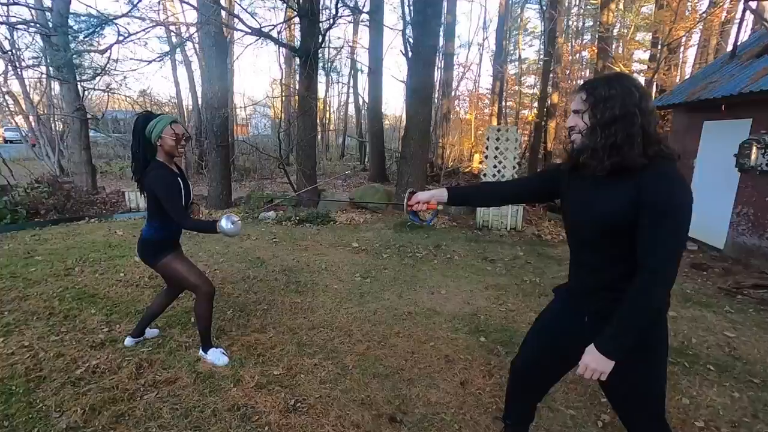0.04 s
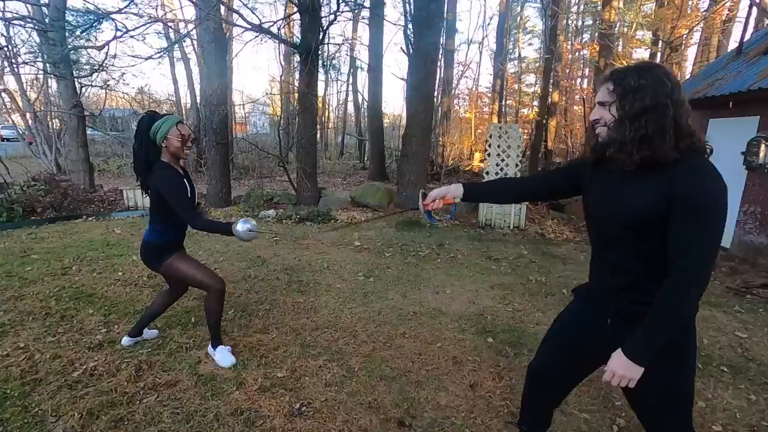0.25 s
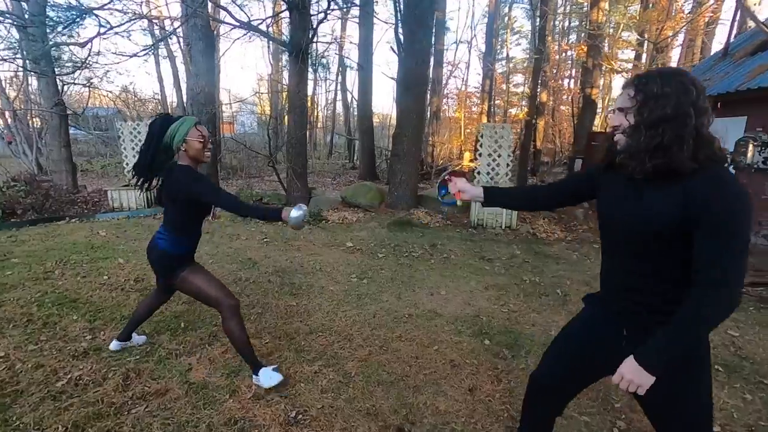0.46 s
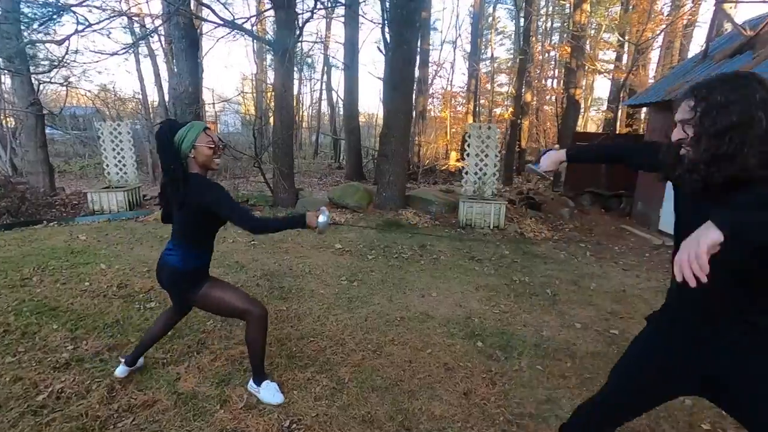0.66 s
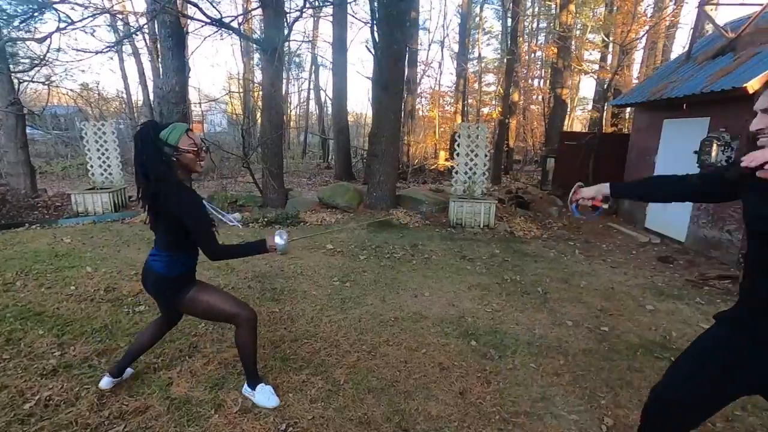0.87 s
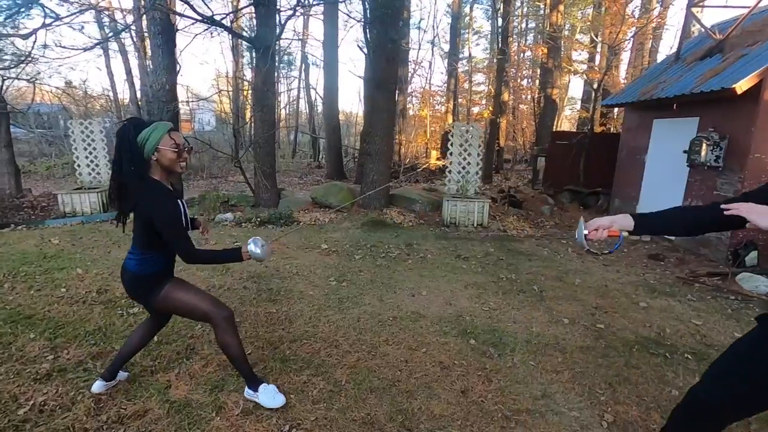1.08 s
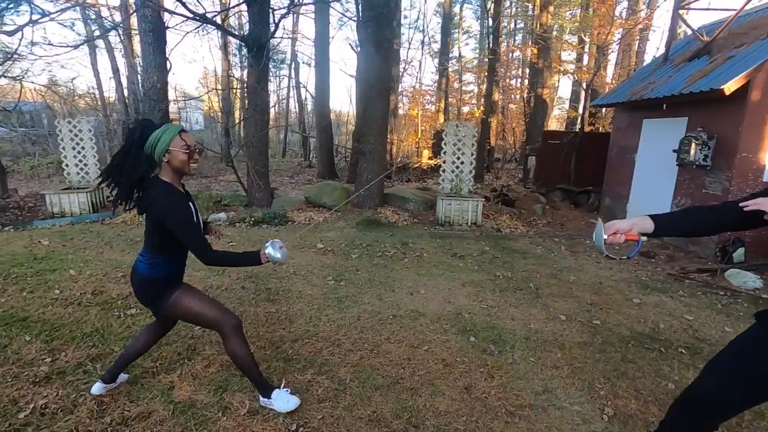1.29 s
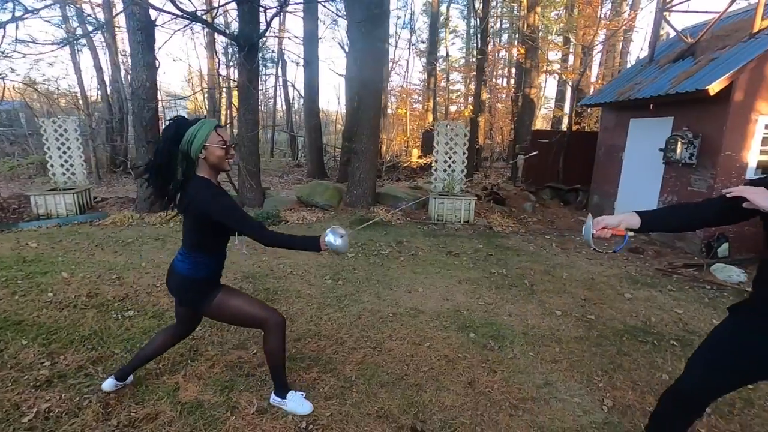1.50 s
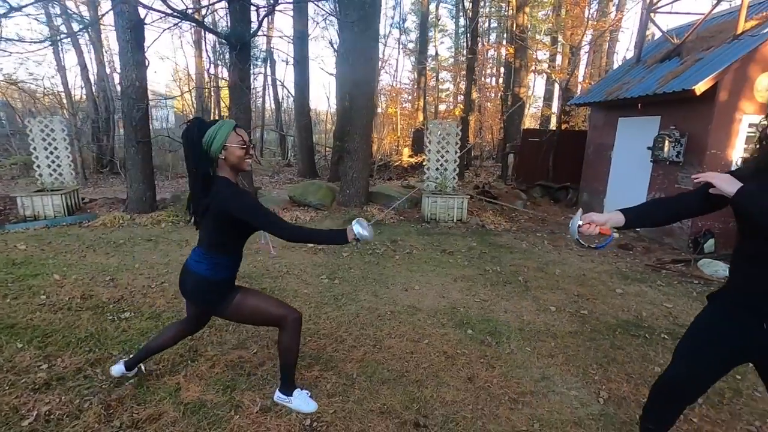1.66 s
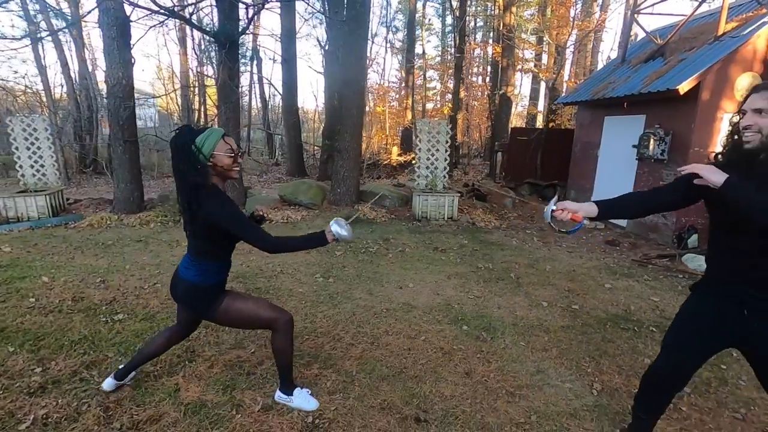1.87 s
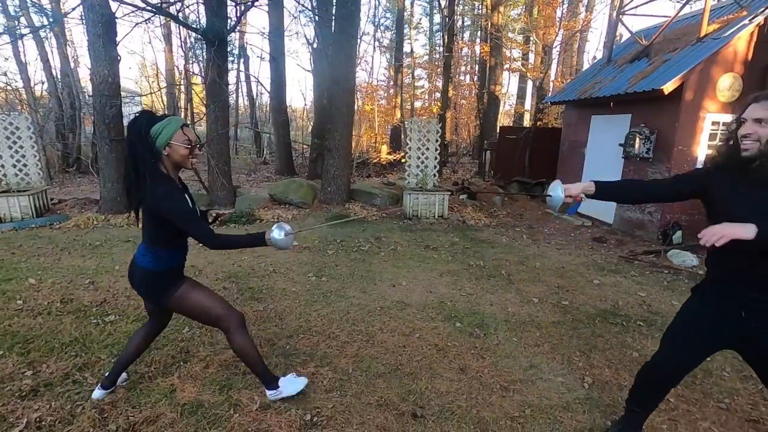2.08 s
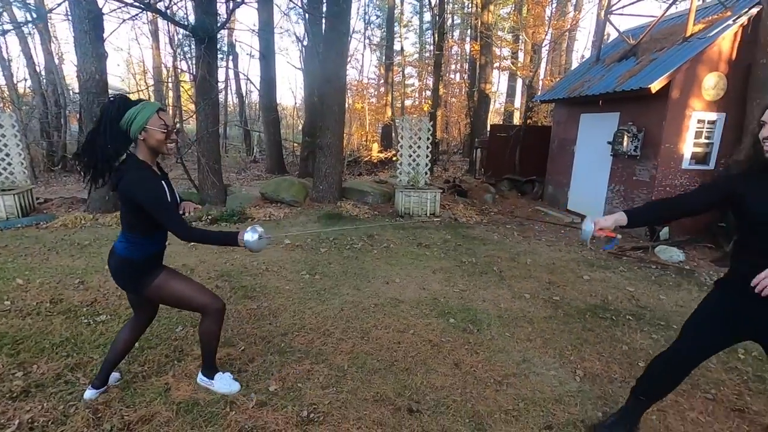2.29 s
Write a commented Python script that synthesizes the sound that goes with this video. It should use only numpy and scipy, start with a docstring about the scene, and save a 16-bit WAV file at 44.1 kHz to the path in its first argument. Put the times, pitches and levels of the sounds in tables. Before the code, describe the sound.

Thin sword blades scrape and clash in a short fencing exchange outdoors.

```python
"""A leafy lawn, two fencers sparring a few metres away. Their thin blades slide along each other twice,
one blow lands on a bell guard, then come a quick rattling exchange and a last ringing beat.
Impact and friction excite the modes of the steel; trees scatter the sound. Feet thud on turf and stir
dry leaves. A low drone, likely a distant engine, swells and fades."""
import sys
import numpy as np
from scipy import signal
from scipy.fft import rfft, irfft
from scipy.io import wavfile
from scipy.ndimage import uniform_filter1d

SR = 44100
rng = np.random.default_rng(int(sys.argv[2]) if len(sys.argv) > 2 else 0)


def unload_wav(signal):
    """Save mono or channel-first audio to the path in sys.argv[1] as 16-bit WAV at rate SR, clipped to [-1, 1]."""
    wavfile.write(
        sys.argv[1],
        SR,
        np.round(np.clip(np.atleast_2d(signal).T, -1, 1) * 32767).astype(np.int16),
    )


N = 108045
TOP_HZ, STEEL_SKEW_RAD = 16000, 0.32

# Dry-leaf spectrum. Each row: frequency in Hz, gain in dB.
LEAF_SPECTRUM = [(200, -5.5), (500, -8.5), (1300, 6), (2500, 0.5), (4500, 0), (7000, -2.5), (10000, -16),
                 (13000, -15), (16000, -43)]


def blows(size=2600, onset_samples=300, crack_gain=0.54, crack_peak_s=0.00096, crack_low_hz=1080):
    """Contact cracks; impact and brief chatter excite the steel; blades and guard ring on."""
    # Each row: start in seconds, clash level in dB, tilt in dB per octave, chatter decay in seconds,
    # then clang, first blade, second blade, guard and left-over-right levels in dB.
    hits = [(0.6195, -16.5, -2, 0.0016, -32, -60, -48, -12, 1.5),
            (1.6791, -18, 0.6, 0.012, -23, -38, -39, -34, -2),
            (1.6965, -25.5, -1, .004, -42, -44, -43, -55, 1),
            (1.7403, -20.5, -1, .009, -32, -37, -43, -38, 0.5),
            (1.7742, -22, -1, .010, -32, -35.5, -50, -48, 1.5),
            (2.0715, -16, 1.84, 0.00092, -27, -28.5, -45, -45, -0.5),
            (2.0832, -34, 3, .0015, -38, -46, -48, -52, 3)]
    # Each row: frequency in Hz, gain in dB.
    clash_spectrum = [(200, -27), (550, -15.5), (750, -15), (1000, -2.5), (1500, 0.5), (2000, -2.5),
                      (2300, 2), (2700, -4), (3600, -2), (5200, -3.5), (6800, 4), (8400, 6.5), (10000, -7),
                      (12000, -2), (13500, -16), (16000, -23)]
    out, t = np.zeros((2, N)), seconds(size)
    hz, gain, tones = steel_modes(t60_at_3khz_s=0.074)
    crack_band = signal.butter(2, [crack_low_hz, TOP_HZ / 2], "band", fs=SR, output="sos")
    crack_envelope = crack_gain * t / crack_peak_s * np.exp(1 - t / crack_peak_s)
    for at, db, tilt_db, chatter_s, clang_db, first_db, second_db, guard_db, pan_db in hits:
        force = friction(size) * np.exp(-t / chatter_s)
        force /= np.linalg.norm(force)
        force[0] += 1  # initial impact
        weights = gain * curve(clash_spectrum, hz) * undb(tilt_db * np.log2(hz))
        clash = convolve(force, radiate(tones, weights, STEEL_SKEW_RAD))
        crack = unit(signal.sosfilt(crack_band, rng.standard_normal(size))) * crack_envelope
        add(out, at, undb(db) * clash / np.std(clash[:, :onset_samples]), pan_db)
        add(out, at, undb(db) * crack, pan_db)
        add(out, at, undb(clang_db) * clang())
        add(out, at, blades(first_db, second_db) + undb(guard_db) * guard())
    return out


def slides(low_cut_hz=800):
    """Edge runs along edge: swelling friction drives the blades, damped while they touch."""
    # Each row: peak time, rise and fall in seconds,
    # then scrape, clang, first blade, second blade and left-over-right levels in dB.
    strokes = [(.247, 0.017, .011, -19.5, -30.5, -45, -32, 1), (0.33, .012, .009, -20, -36, -68, -43, -0.5),
               (1.812, .025, 0.01, -29, -39.5, -45.5, -33, 1)]
    # Each row: frequency in Hz, gain in dB.
    scrape_spectrum = [(200, -32), (750, -34), (1050, -4), (1450, 5.5), (2000, -0.5), (2500, -3.5),
                       (3200, -0.5), (3600, 7.5), (4500, 1.5), (6600, 3.5), (8500, 3), (10000, -5),
                       (12500, -6), (16000, -45)]
    out = np.zeros((2, N))
    hz, gain, tones = steel_modes(t60_at_3khz_s=0.04)
    highpass = signal.butter(4, low_cut_hz, "high", fs=SR, output="sos")
    for at, rise_s, fall_s, db, clang_db, first_db, second_db, pan_db in strokes:
        body = signal.sosfilt(highpass, radiate(tones, gain * curve(scrape_spectrum, hz), STEEL_SKEW_RAD))
        force = friction(N) * swell(at, rise_s, fall_s)
        add(out, 0, undb(db) * convolve(force, body / np.linalg.norm(body[0])), pan_db)
        add(out, at - rise_s, blades(first_db, second_db))
        add(out, at - rise_s, undb(clang_db) * clang())
    return out


def steel_modes(t60_at_3khz_s, count=640, scatter_db=4):
    """Dense, short-lived bending modes of two long blades; higher ones die sooner."""
    hz = np.linspace(np.sqrt(200), np.sqrt(TOP_HZ), count) ** 2
    hz = hz + np.gradient(hz) * rng.uniform(-0.42, 0.51, count)
    gain = np.sqrt(np.gradient(hz)) * undb(scatter_db * rng.standard_normal(count))
    t60_s = t60_at_3khz_s * (hz / 3000) ** -0.32
    return hz, gain, vibrate(hz, t60_s, size=6000)


def blades(first_db, second_db, attack_s=0.014):
    """Both blades ring on after a contact."""
    # Each row: mode frequency in Hz, gain in dB, t60 in seconds.
    first_modes = [(560, -27, .3), (962, -8, .3), (1028, 0, .5), (1269, -10, .48), (1322, -8, .28),
                   (1394, -9, .22), (1542, -7, .36), (1703, -9, .26), (2027, -10, .4), (2830, -17, .25),
                   (3343, -9, .31), (4463, -15, .41), (6476, -19, .42), (7402, -22, .4)]
    second_modes = [(1002, -5, .2), (1077, -2, .2), (1417, 1, .17), (1483, 1, .16), (1688, -5, .2),
                    (1982, -4, .15), (3047, -16, .33), (3155, -5, .14), (3430, 1, .11), (3563, 4, .1),
                    (6220, -12, .6), (6440, -2, .13), (7643, -5, .11), (8345, -5, .1)]
    return undb(first_db) * ring(first_modes, attack_s) + undb(second_db) * ring(second_modes, attack_s)


def guard():
    """The bell guard rings: strong brief modes, faint lasting ones."""
    # Each row: mode frequency in Hz, gain in dB, t60 in seconds.
    modes = [(1147, -7, 0.038), (1260, -26, 0.54), (1378, -20.5, 0.58), (1388, 7, 0.053), (1473, -28, 0.66),
             (1725, -35.5, 0.99), (1683, -6, 0.063), (2490, -11.5, 0.073), (3047, -37.5, 0.96),
             (5000, -42, 0.99), (6202, -38, 0.82)]
    return ring(modes, attack_s=0.0016)


def clang(t60_s=0.34, attack_s=0.021):
    """Low modes, too close to hear apart, swell and fade as a band of noise."""
    # Each row: frequency in Hz, gain in dB.
    spectrum = [(300, -37), (550, -10), (780, -29.5), (950, 1), (1120, -3.5), (1400, 7), (1750, -5.5),
                (1900, -10), (2200, -9.5), (3200, -12.5), (6000, -20), (9000, -40), (14000, -60)]
    return noise(spectrum, width=0.32) * bloom(attack_s, t60_s)


def ring(modes, attack_s, scatter_db=5):
    """Modes of a struck part, weighted anew at each contact."""
    hz, db, t60_s = np.array(modes, float).T
    gain = undb(db + scatter_db * rng.standard_normal(len(hz)))
    sound = radiate(vibrate(hz, t60_s, size=32000), gain, STEEL_SKEW_RAD / 2)
    return sound * (1 - np.exp(-seconds(sound.shape[1]) / attack_s))


def vibrate(hz, t60_s, size):
    """Decaying complex tones, one row per mode."""
    return np.exp(np.outer(2j * np.pi * hz - np.log(1000) / t60_s, seconds(size)).astype(np.complex64))


def radiate(tones, gain, skew_rad):
    """Sum modes in random phase, skewed between left and right."""
    phase = rng.uniform(0, 2 * np.pi, len(gain))
    skew = skew_rad * rng.standard_normal(len(gain))
    weights = gain * np.exp(1j * (phase + np.array([skew, -skew])))
    return (weights.astype(np.complex64) @ tones).real


def friction(size, grain_db=4.5):
    """Dense micro-impacts of uneven strength."""
    impacts = rng.standard_normal(size)
    return unit(impacts * undb(grain_db * np.minimum(rng.exponential(size=size), 2 * np.pi)))


def ticks(size=3000):
    """Hilts and twigs click: short bursts of band-passed noise."""
    # Each row: start in seconds, level in dB, centre in Hz, bandwidth in octaves, t60 in seconds.
    clicks = [(0.033, -44.5, 1130, 0.45, 0.091), (0.181, -37, 1115, 0.27, 0.034),
              (.216, -34, 4000, 1.4, 0.023), (0.797, -40, 2560, 1.1, .02), (0.9, -44, 2280, 0.6, .02),
              (0.9926, -37, 2400, 1.3, 0.01), (1.563, -47, 4500, 2.4, 0.021),
              (1.6028, -45, 2380, 2.2, .014), (1.848, -36.5, 6530, 0.61, 0.036)]
    out, t = np.zeros((2, N)), seconds(size)
    for at, db, hz, octaves, t60_s in clicks:
        edges_hz = np.minimum(hz * 2 ** (np.array([-octaves, octaves]) / 2), TOP_HZ)
        band = signal.butter(2, edges_hz, "band", fs=SR, output="sos")
        fade = np.exp(-np.log(1000) * t / t60_s)
        click = signal.sosfilt(band, rng.standard_normal(size) * fade)
        add(out, at, undb(db) * click * np.linalg.norm(fade) / np.linalg.norm(click))
    return out


def place_right(swords, left_delay_s=0.000039):
    """The left microphone faces away from the swords: later arrival, less treble."""
    # Each row: frequency in Hz, gain in dB.
    left_shade = [(2500, -1), (5000, 1), (8000, -5.5), (12000, -10.5), (16000, -8)]
    hz = np.fft.rfftfreq(N, 1 / SR)
    delay = np.exp(-2j * np.pi * hz * left_delay_s)
    left = irfft(rfft(swords[0]) * curve(left_shade, hz) * delay, N)
    return np.array([left, swords[1]])


def yard_echo(x, gain_db=-17, t60_s=0.48, attack_s=0.0043):
    """Trunks and a shed scatter a thin, wide tail."""
    # Each row: frequency in Hz, gain in dB.
    spectrum = [(200, 16), (700, 7.5), (1400, 6.5), (3000, -4), (6500, -4), (10000, -7.5), (16000, -5)]
    tail = noise(spectrum, width=1.27) * bloom(attack_s, t60_s)
    return undb(gain_db) * convolve(x.mean(axis=0), tail / np.linalg.norm(tail[0]))


def rustle():
    """Leaves and clothes rub with a grainy hiss."""
    # Each row: time in seconds, level in dB.
    levels = [(0, -65.5), (.09, -61), (.135, -49.5), (.2, -53), (.42, -59), (.53, -53.5), (0.573, -45.5),
              (.6, -48), (.74, -45.5), (.88, -54.5), (.96, -63), (1.5, -62.5), (1.66, -56), (2.02, -54.5),
              (2.22, -63), (2.265, -53.5), (2.33, -61.5), (2.45, -63)]
    grain = unit(np.sqrt(uniform_filter1d(np.abs(friction(N)), size=50) + 1e-9))
    return noise(LEAF_SPECTRUM, width=0.78) * grain * undb(np.interp(seconds(N), *np.array(levels).T))


def footfalls(thud_rise_s=0.0072, thud_fall_s=0.035):
    """Soles scuff and heels thud on turf."""
    # Each row: peak time, rise and fall in seconds, level in dB.
    steps = [(0.596, 0.033, .015, -43), (0.626, 0.0076, 0.021, -38), (.81, 0.033, 0.084, -51.5),
             (1.74, 0.069, 0.14, -51.5)]
    # Each row: peak time in seconds, level in dB.
    heels = [(0.661, -44.5), (0.801, -46), (0.894, -48), (1.80, -54)]
    # Each row: frequency in Hz, gain in dB.
    scuff_spectrum = [(120, 7.5), (280, -4), (450, -2), (700, -1), (1200, -3), (4000, -43), (12000, -65)]
    thud_spectrum = [(60, -16), (110, 3.5), (185, 1), (270, -7.5), (450, -49), (1500, -72)]
    scuff_gain = sum(undb(db) * swell(at, rise_s, fall_s) for at, rise_s, fall_s, db in steps)
    thud_gain = sum(undb(db) * swell(at, thud_rise_s, thud_fall_s) for at, db in heels)
    return noise(scuff_spectrum, width=0.45) * scuff_gain + noise(thud_spectrum, width=0.58) * thud_gain


def crackles(count=70, floor_db=-69, spread_db=3.5, decay_s=0.0012):
    """Dry leaves snap at random underfoot."""
    snaps = np.zeros(N)
    snap_db = floor_db + spread_db * np.minimum(rng.exponential(size=count), np.pi)
    snaps[rng.integers(0, N, count)] = undb(snap_db)
    return noise(LEAF_SPECTRUM, width=0.7) * convolve(snaps, np.exp(-seconds(500) / decay_s)[None])


def engine(drone_hz=64.15, drone_trim_db=1):
    """A far engine: a low drone and a sinking upper hum, each swelling and fading."""
    # Each row: time in seconds, level before trim in dB.
    drone_levels = [(0.0, -44), (0.07, -41), (0.14, -56), (0.37, -77), (0.4, -46), (0.54, -34), (0.73, -59),
                    (0.79, -41), (1.23, -69), (1.38, -34.5), (1.6, -60.5), (1.68, -43.5), (1.87, -44),
                    (1.92, -56), (2.21, -41), (2.45, -58)]
    # Each row: time in seconds, pitch in Hz, level in dB.
    hum_track = [(0, 130.4, -54), (.45, 133, -64), (.95, 131.3, -63), (1.12, 128.3, -49.5),
                 (1.3, 123.5, -61.5), (1.55, 125.4, -72), (1.8, 115.1, -50.5), (2.0, 110.2, -61),
                 (2.25, 112.7, -48), (2.45, 105, -56)]
    t = seconds(N)
    times, hum_hz, hum_db = np.array(hum_track).T
    drone = wandering_tone(drone_hz, drone_trim_db + np.interp(t, *np.array(drone_levels).T))
    hum = wandering_tone(np.interp(t, times, hum_hz), np.interp(t, times, hum_db))
    return drone + hum


def wandering_tone(hz, db, depth=0.0125):
    """A sine with slight random pitch drift."""
    wander = unit(uniform_filter1d(rng.standard_normal(N), size=6000))
    return np.sqrt(2) * undb(db) * np.sin(2 * np.pi * np.cumsum(hz * (1 + depth * wander)) / SR)


def ambience(rumble_db=-49, air_db=-61.5):
    """Steady low rumble and quiet, wide air."""
    # Each row: frequency in Hz, gain in dB.
    rumble_spectrum = [(15, -28), (28, 8), (38, -0.5), (50, 7.5), (85, 2), (115, -5), (135, 2.5),
                       (160, -10.5), (185, -7), (210, -16.5), (320, -41), (1000, -82)]
    air_spectrum = [(100, -28), (200, 1.5), (300, 0.5), (480, -4.5), (700, -11), (1250, -0.5), (2000, -6.5),
                    (4000, -12), (7000, -19), (10000, -24), (13000, -37), (14500, -43), (16000, -60)]
    rumble = undb(rumble_db) * noise(rumble_spectrum, width=0.1)
    return rumble + undb(air_db) * noise(air_spectrum, width=1.48)


def noise(spectrum, width, bass_width=0.23, widen_hz=1790):
    """Coloured stereo noise at rms 1; width sets the side share above widen_hz."""
    hz = np.fft.rfftfreq(N, 1 / SR)
    mid, side = rfft(rng.standard_normal((2, N)))
    side = side * np.hypot(bass_width, width * hz / (hz + widen_hz))
    return unit(irfft(np.array([mid + side, mid - side]) * curve(spectrum, hz), N))


def curve(spectrum, hz):
    """Linear gain of a (Hz, dB) table, interpolated in log frequency."""
    knots_hz, db = np.array(spectrum, float).T
    return undb(np.interp(np.log(np.maximum(hz, 1)), np.log(knots_hz), db))


def swell(at, rise_s, fall_s):
    """Rounded peak with exponential flanks."""
    t = seconds(N) - at
    return np.exp(1 - np.hypot(1, t / np.where(t < 0, rise_s, fall_s) * np.sqrt(2)))


def bloom(attack_s, t60_s):
    """Soft attack, exponential decay."""
    t = seconds(N)
    return np.exp(-np.log(1000) * t / t60_s) * (1 - np.exp(-t / attack_s))


def add(out, at, sound, pan_db=0):
    """Mix in at a time in seconds; positive pan_db is left."""
    i = max(int(at * SR), 0)
    out[:, i:i + sound.shape[-1]] += sound[..., :N - i] * undb(np.array([[pan_db], [-pan_db]]) / 2)


def convolve(x, response):
    return signal.fftconvolve(np.atleast_2d(x), response, axes=1)[:, :N]


def undb(db):
    return 10 ** (np.asarray(db) / 20)


def unit(x):
    return x / np.sqrt(np.mean(x ** 2))


def seconds(size):
    return np.arange(size) / SR


def scene():
    """Swords slightly to the right, their echo, footwork and background."""
    swords = blows() + slides() + ticks()
    fencing = place_right(swords) + yard_echo(swords) + rustle() + footfalls() + crackles()
    return fencing + engine() + ambience()


def record(dry):
    """Steep low-pass at TOP_HZ."""
    return signal.sosfilt(signal.ellip(8, .2, 70, TOP_HZ, fs=SR, output="sos"), dry)


dry = scene()
out = record(dry)
unload_wav(out)
```